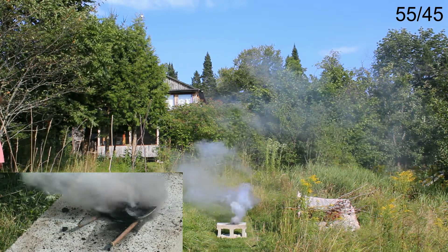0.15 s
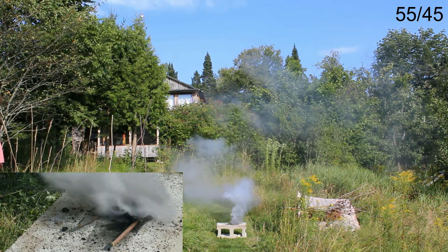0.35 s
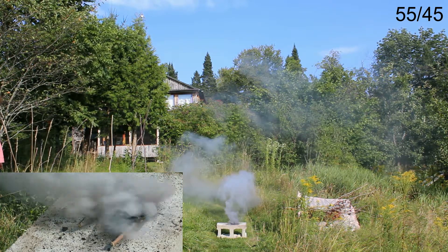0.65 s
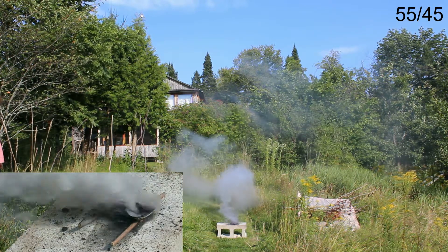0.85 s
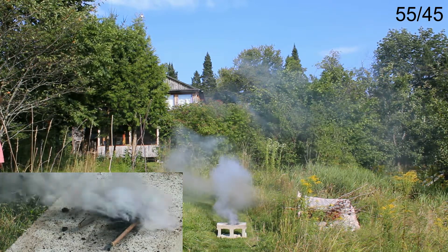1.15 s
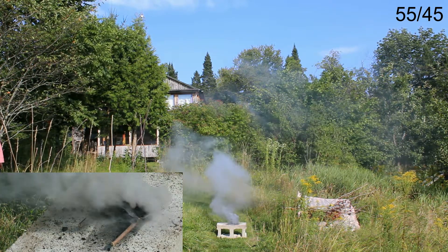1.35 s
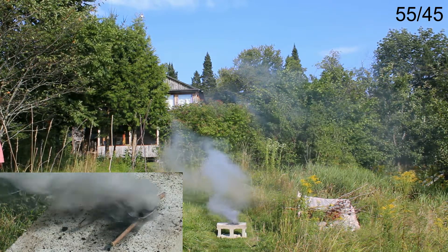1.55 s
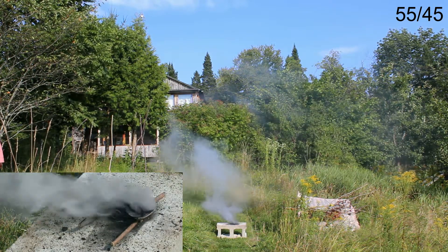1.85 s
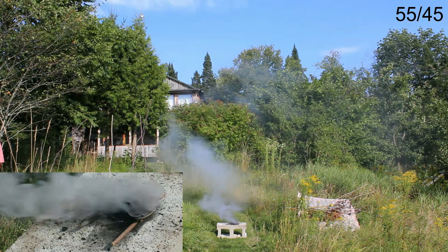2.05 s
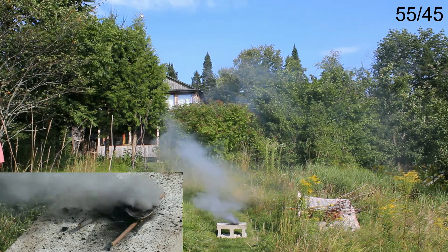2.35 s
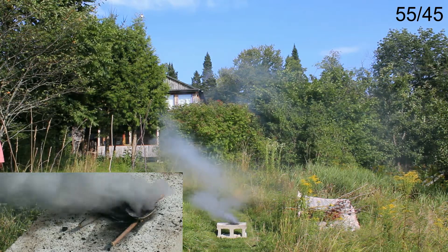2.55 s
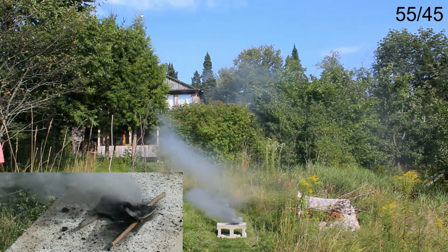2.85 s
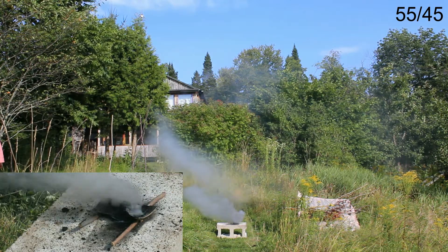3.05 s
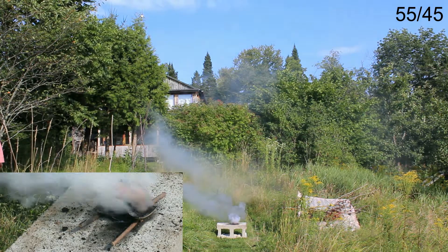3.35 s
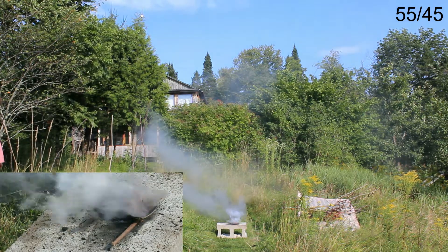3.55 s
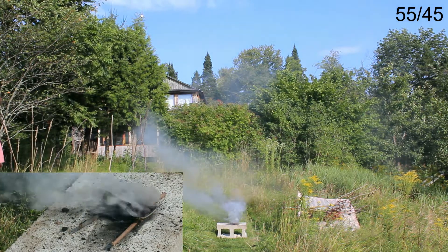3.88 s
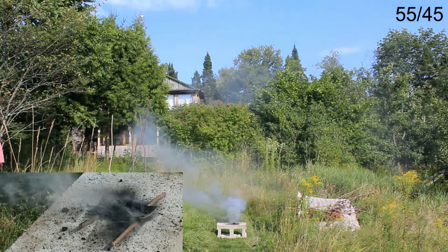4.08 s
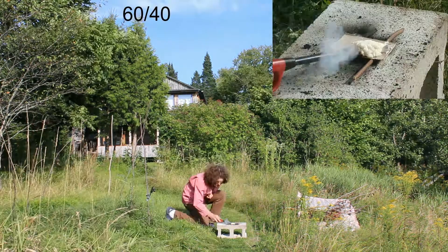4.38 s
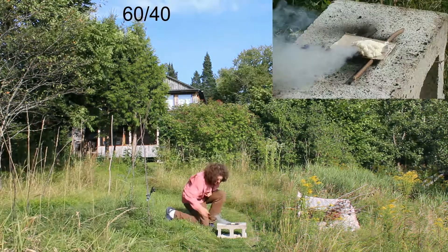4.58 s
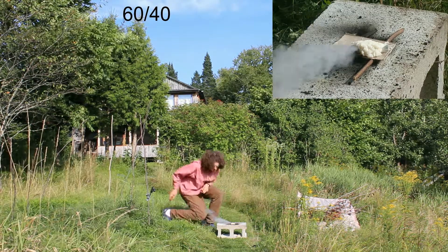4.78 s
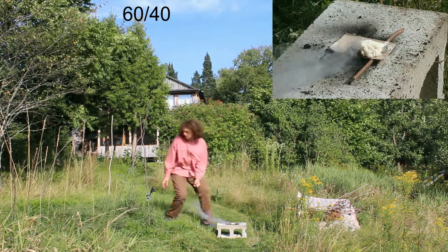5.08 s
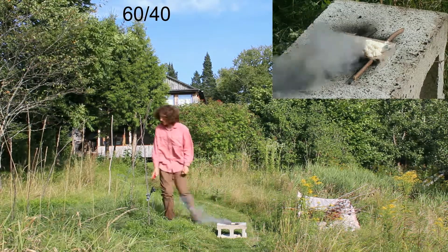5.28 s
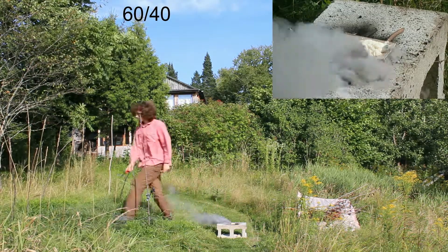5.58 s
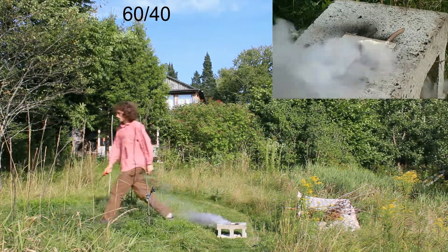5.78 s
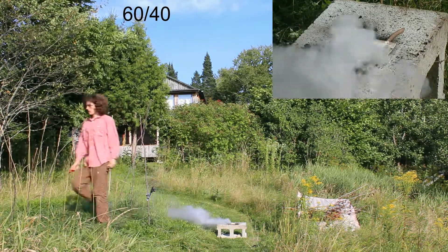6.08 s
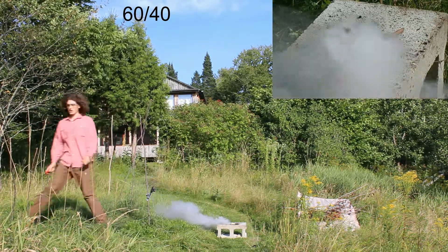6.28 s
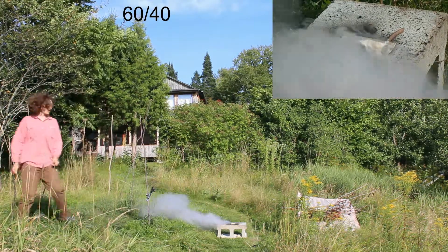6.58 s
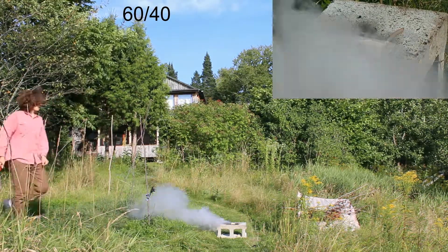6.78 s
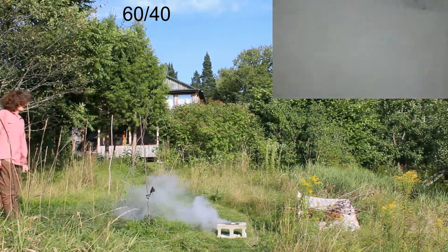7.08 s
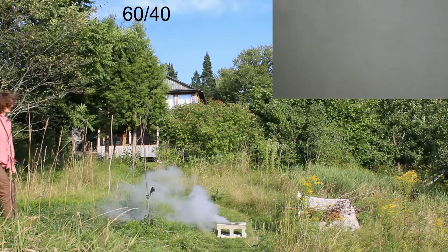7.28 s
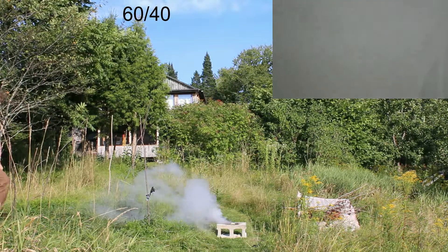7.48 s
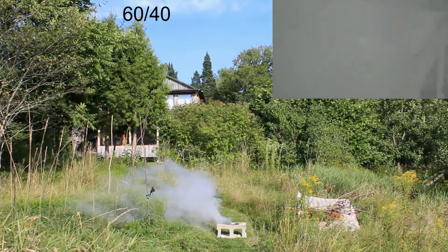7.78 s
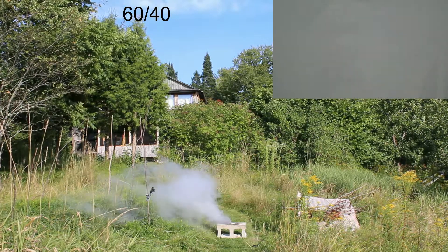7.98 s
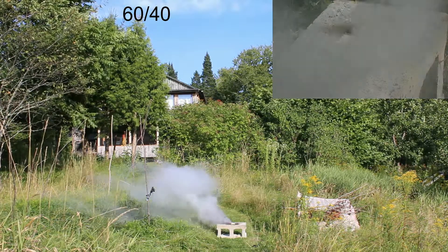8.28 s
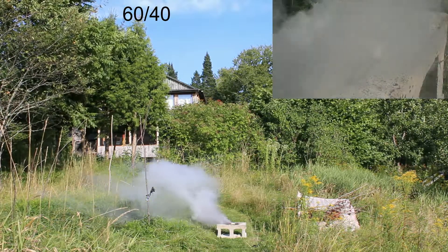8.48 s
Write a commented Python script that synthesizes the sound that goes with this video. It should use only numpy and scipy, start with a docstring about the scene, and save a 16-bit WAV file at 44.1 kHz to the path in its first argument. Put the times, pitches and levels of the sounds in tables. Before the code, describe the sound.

A close microphone catches gas escaping from a small burning heap: uneven high hiss, crackly fizz and a breathy mid roar. It chokes, puffs a few times and nearly stops, then an intense hiss jumps in with a tiny bright pop. About six seconds in, low thumps and rumbles buffet the microphone, the rush grows fuller and sweeps through the hiss, which continues to the end. Quiet open garden air.

```python
"""A hiss with a roar and a fizz in it gutters out in a few puffs, then returns abruptly at full flow.
Two small heaps of smoke mixture burn in turn on a concrete block in a garden, heard from close by.
Gas escaping through each crust is shaped turbulent noise peppered with tiny bursts.
As the second jet swings round, moving spectral hollows and ridges make the hiss hollow and phasey,
and the plume buffets the microphone with low rumbles and single swings of pressure."""
import sys
import numpy as np
from scipy import signal
from scipy.fft import rfft, irfft, next_fast_len
from scipy.io import wavfile
from scipy.ndimage import uniform_filter1d, map_coordinates

SR = 44100
rng = np.random.default_rng(int(sys.argv[2]) if len(sys.argv) > 2 else 0)


def file_out(sig):
    """Save sig as 16-bit WAV at sys.argv[1]."""
    # one column per channel
    cols = np.atleast_2d(sig).T
    # limit, then scale
    lim = np.clip(cols, -1, 1)
    pcm = np.round(lim * 32767).astype(np.int16)
    wavfile.write(sys.argv[1], SR, pcm)


N = 380583
SECOND_STARTS_S = 4.3455


def amp(db):
    """Level law: 20 dB is a factor of ten in pressure."""
    return 10 ** (np.asarray(db) / 20)


def unit(x):
    """Normalisation: equal rms means equal mean power, here 1."""
    return x / np.sqrt(np.mean(x ** 2) + 1e-20)


def clock():
    """Sampling: sample n falls at n / SR seconds."""
    return np.arange(N) / SR


def curves(rows):
    """Linear interpolation in time of each column after the first."""
    s, *columns = np.transpose(rows)
    return np.array([np.interp(clock(), s, column) for column in columns])


def wobble(rate):
    """Slow random modulation: a smooth curve through random knots, rate of them a second."""
    knots = rng.standard_normal(int(N * rate / SR) + 4)
    return map_coordinates(knots, [np.arange(N) * rate / SR])


def bell(centre, half, x=None):
    """Gaussian pulse of height 1, down to 1/e at half from its centre, in time unless x is given."""
    position = clock() if x is None else x
    return np.exp(-((position - centre) / half) ** 2)


def filtered(x, response):
    """Linear filtering: the spectrum is multiplied by a response of frequency."""
    size = next_fast_len(N + SR // 2)  # padding keeps the end from wrapping round to the start
    hz = np.fft.rfftfreq(size, 1 / SR)
    return irfft(rfft(x, size) * response(hz), size)[..., :N]


def coloured(x, spectrum):
    """Spectral shaping along (Hz, dB) points on a logarithmic frequency axis, at rms 1."""
    f, db = np.transpose(spectrum)
    return unit(filtered(x, lambda hz: amp(np.interp(np.log(hz + 1), np.log(f), db))))


def turbulence(patchy_db):
    """Turbulent noise: its colour shifts in small patches of time and frequency."""
    z = signal.stft(rng.standard_normal(N), nperseg=512)[2]
    across_frequency = uniform_filter1d(rng.standard_normal(z.shape), size=8, axis=0)
    patches = unit(uniform_filter1d(across_frequency, size=14, axis=1))
    return unit(signal.istft(z * amp(patchy_db * patches), nperseg=512)[1][:N])


def sputter(rate, spread_db):
    """Random impulse train: tiny gas bursts at chance moments, a few much larger than the rest."""
    happens = rng.random(N) < rate / SR
    size = amp(spread_db * np.minimum(rng.exponential(size=N), 4))
    return unit(happens * size * rng.choice([-1, 1], N))


def gas(spectrum, patchy_db, sputter_db):
    """Flow noise of escaping gas: turbulence peppered with bursts, under one spectrum."""
    bursts = amp(sputter_db) * sputter(rate=1500, spread_db=3)
    return coloured(turbulence(patchy_db) + bursts, spectrum)


def background():
    """Ambient sound: broadband garden air, with nearly pure tones whose phase drifts and a noise-band drone."""
    # garden air: frequency_hz, density_db
    garden = [(20, 6.5), (45, -34), (80, 1.5), (130, 2.5), (250, 2), (420, -2.5), (900, -4.5),
              (2000, -14.5), (5000, -12.5), (8900, -6), (12000, -14), (16000, -21)]
    # faint drone above the hum: frequency_hz, density_db
    drone_band = [(330, -33), (450, -4), (520, -3), (600, -3), (800, -30)]
    t = clock()
    air = amp(-63.5) * coloured(rng.standard_normal(N), garden)

    def tone(hz, db, drift_rad):
        phase = 2 * np.pi * hz * t + drift_rad * wobble(8)
        return amp(db) * np.sqrt(2) * np.sin(phase)

    # the thin electronic whine fades by 5 dB per second in the second burn
    whine_db = -75 - 5 * np.maximum(t - SECOND_STARTS_S, 0)
    whine = tone(14948, whine_db, drift_rad=1.5)
    hum = tone(75.4, -77, drift_rad=.3)
    drone = amp(-68) * coloured(rng.standard_normal(N), drone_band)
    hum_end_s, hum_fade_s = 5.6, .6  # the end is the middle of the fade
    present = (t >= SECOND_STARTS_S) * np.clip(.5 + (hum_end_s - t) / hum_fade_s, 0, 1)
    return air + whine + (hum + drone) * present


def buffeting():
    """Flow-induced microphone noise: gusts push the plume onto it as lumpy low-frequency rumble."""
    # gusts: centre_s, half_length_s, level_db (before the lumps)
    gusts = [(0.18, .04, -68), (0.32, 0.13, -65), (5.88, 0.11, -66), (6.188, 0.063, -57),
             (6.48, 0.16, -56.5), (6.72, .05, -65), (6.95, 0.066, -59), (7.08, 0.053, -62),
             (7.2, 0.068, -62), (7.42, 0.17, -71)]
    # rumble: frequency_hz, density_db
    rumble = [(15, -4), (40, -7), (80, -1), (120, -3), (200, -6.5), (400, -12), (900, -45)]
    level = sum(amp(db) * bell(s, half) for s, half, db in gusts)
    lumps = amp(2.1 * wobble(25))
    return level * lumps * coloured(rng.standard_normal(N), rumble)


def thumps():
    """Eddy pressure: each passing eddy is one swing, a pull and then a push."""
    # eddies that hit the microphone: centre_s, peak_db, pitch_hz
    eddies = [(.274, -55, 85), (0.328, -49, 100), (5.989, -51, 85), (6.008, -52, 100), (6.138, -44.5, 189),
              (6.162, -45, 89), (6.204, -47, 110), (6.236, -49, 89), (7.392, -56, 90), (7.565, -54, 70)]
    swings = [(2 * np.pi * hz * (clock() - s), db) for s, db, hz in eddies]
    return sum(amp(db) * u * np.exp((1 - u * u) / 2) for u, db in swings)  # peaks at u = -1 and 1


def wash():
    """Superposed flow noise: the rush turns fuller while the smoke passes over the microphone."""
    # rush of the smoke: frequency_hz, density_db
    wash_spectrum = [(380, -13.5), (560, -4.5), (800, -4), (1300, -0.5), (1800, -12), (2300, -4),
                     (2750, 5.5), (3300, -1), (4500, -25)]
    passing = bell(6.68, half=0.53)
    return amp(-47 + 0.7 * wobble(20)) * passing * gas(wash_spectrum, patchy_db=1.5, sputter_db=-12)


def pops():
    """Impulsive release: a bursting grain gives a short, bright puff that decays exponentially."""
    # grains that burst: start_s, level_db, t60_s
    grains = [(4.4855, -24.5, .012), (5.7803, -40, .012)]
    level = 0
    for s, db, t60 in grains:
        age = clock() - s
        level = level + (age >= 0) * amp(db - 60 * np.abs(age) / t60)
    # frequency_hz, density_db
    bright = [(500, -24), (3200, -3), (7000, 0), (11000, 3), (13000, -4), (15500, -12)]
    return level * coloured(rng.standard_normal(N), bright)


def guttering():
    """Intermittent flow: the last crumbs of the first heap flare up one by one."""
    # last puffs: centre_s, half_length_s, level_db
    puffs = [(4.059, 0.029, -53), (4.117, 0.0066, -54), (4.149, 0.017, -51), (4.222, 0.019, -55),
             (4.3, 0.023, -64)]
    # their noise: frequency_hz, density_db
    crumbs = [(600, -9), (2000, -14), (3300, -2.5), (4900, -10), (7400, 5), (10500, -2.5), (15000, -20)]
    level = sum(amp(db) * bell(s, half) for s, half, db in puffs)
    return level * gas(crumbs, patchy_db=-1, sputter_db=2)


def swish(x):
    """Time-varying filtering: drifting hollows and ridges turn the hiss phasey while the jet swings."""
    # hollows (negative) and ridges (positive): centre_s, half_length_s, centre_hz, glide_hz_per_s, gain_db
    hollows = [(6.28, .18, 9800, 800, -9), (6.33, .15, 9250, -600, 7), (6.6, .4, 6200, 0, -6),
               (6.65, .4, 5400, -300, 4), (6.55, .1, 8100, 0, -4), (6.8, .35, 11250, 0, 4),
               (6.85, .3, 10700, 0, -5), (6.9, .3, 13700, 0, 4), (7.05, .22, 8900, -500, -7)]
    hz, t, z = signal.stft(x, SR, nperseg=512)
    gain_db = 0
    for s, half, centre_hz, glide, db in hollows:
        band = bell(centre_hz + glide * (t - s), 340, hz[:, None])  # half width 340 Hz
        gain_db = gain_db + db * bell(s, half, t) * band
    return signal.istft(z * amp(gain_db), SR, nperseg=512)[1][:N]


def plume_rush():
    """Low-frequency flow noise of the plume, louder as it leans towards the microphone."""
    # lean of the plume: time_s, gain_db
    lean = [(0, 0.5), (4.4, 0.5), (5.0, -4), (5.38, 0.5), (5.48, -3), (5.68, -3.5), (5.8, 0.5), (6.55, 2.5),
            (7.25, -3), (7.7, -4), (8.63, -2.5)]
    # rush: frequency_hz, density_db
    plume_spectrum = [(150, -27), (300, -17), (430, -26.5), (550, -12.5), (800, -6), (1080, -1.5),
                      (1500, -5), (2000, -8), (3000, -16), (6000, -52)]
    return amp(curves(lean)[0]) * gas(plume_spectrum, patchy_db=0.5, sputter_db=-14)


def jet_roar():
    """Jet noise: a broad mid-frequency band of turbulence."""
    # roar: frequency_hz, density_db
    roar_spectrum = [(700, -30), (1500, -24.5), (2000, -17), (2350, -10), (2850, -3.5), (3700, -2),
                     (4300, -3), (4900, -9.5), (5600, -5.5), (7000, -6), (10000, -65)]
    return gas(roar_spectrum, patchy_db=0.5, sputter_db=-10)


def pore_hiss(surge_db):
    """Addition of powers: broad and focused hiss share unit power; fresh vents add that of a surge."""
    # sharpening from the broad hiss to the focused one: time_s, focused_power_share
    focusing = [(0, 0.38), (3.1, .05), (3.45, 1), (4.0, .7), (4.36, 0.86), (8.63, 0.7)]
    # open crust, tighter crust and fresh vent, each: frequency_hz, density_db
    broad_spectrum = [(4500, -29), (4950, -9), (5450, 1), (6100, -1.5), (6700, -0.5), (7250, 5),
                      (8200, 0.5), (8900, -3), (9700, -2), (10600, -9), (11800, -5.5), (14000, -20)]
    sharp_spectrum = [(4500, -33.5), (4950, -24.5), (5550, -8.5), (6200, -14), (6700, -5.5), (7250, 1),
                      (8200, 0), (8950, -7.5), (9900, -5.5), (10700, -7.5), (11800, -20.5), (13000, -34),
                      (15000, -45)]
    vent_spectrum = [(4800, -31.5), (5600, -12), (6400, -11.5), (7200, 0), (8100, -0.5), (9000, -8.5),
                     (10200, -4.5), (12500, -27)]
    focus = np.clip(curves(focusing)[0], 0, 1)
    broad = np.sqrt(1 - focus) * gas(broad_spectrum, patchy_db=3.3, sputter_db=-5)
    sharp = np.sqrt(focus) * gas(sharp_spectrum, patchy_db=1.1, sputter_db=-17)
    vent = np.sqrt(amp(surge_db) ** 2 - 1) * gas(vent_spectrum, patchy_db=3.1, sputter_db=-11)
    return broad + sharp + vent


def fine_fizz():
    """High-frequency flow noise of the finest pores, flaring as fresh mixture catches."""
    # flares: centre_s, half_length_s, rise_db
    flares = [(0.74, .035, 9.5), (1.16, 0.036, 6), (1.293, .06, 13), (1.55, 0.12, 7.5), (1.82, .025, 7.5),
              (2.02, 0.023, 4), (2.356, 0.11, 5), (2.514, 0.023, 6.5), (2.71, 0.044, 3), (3.22, 0.012, 7.5),
              (3.307, .045, 6.5), (3.617, .022, 8), (4.91, .05, 12), (5.406, 0.08, 8), (5.56, 0.098, 10.5),
              (6.134, 0.054, 6.5), (7.31, .07, 7.5), (7.794, .05, 15), (8.423, 0.086, 9.5)]
    # fizz: frequency_hz, density_db
    fizz_spectrum = [(5000, -43), (8300, -8), (9000, -12), (9700, 1), (11300, 2), (12600, -3.5),
                     (14000, -7), (15000, -26), (15500, -16)]
    flare_db = sum(db * bell(s, half) for s, half, db in flares)
    return amp(flare_db + 0.6 * wobble(45)) * gas(fizz_spectrum, patchy_db=2.0, sputter_db=-9)


def burn():
    """Common modulation: one uneven flow drives the plume, jet, pores and finest pores together."""
    # slow course of each burn: time_s, roar_db, hiss_db, fizz_db
    first_burn = [(0, -46, -41, -46.5), (0.35, -42, -43.5, -45), (0.7, -43, -42, -48.5),
                  (0.98, -44, -43.5, -46.5), (1.6, -42.5, -41.5, -48), (2.15, -43, -43, -44.5),
                  (2.6, -42, -43.5, -43), (2.85, -44, -42, -44), (3.45, -44, -41, -46),
                  (3.85, -48, -42.5, -47), (3.93, -52, -44, -62), (4.0, -53.5, -46, -59),
                  (4.08, -66, -54, -71)]
    second_burn = [(4.35, -45.5, -38.5, -57), (4.5, -43, -36.5, -56), (4.85, -43, -33.5, -55),
                   (5.35, -42.5, -35.5, -51.5), (5.65, -45, -35.5, -49), (5.9, -42, -38.5, -49.5),
                   (6.15, -45, -40, -48.5), (6.45, -42.5, -42, -46), (6.9, -39.5, -41, -45.5),
                   (7.12, -39.5, -39, -47.5), (7.3, -39.5, -37, -50), (7.68, -41.5, -35.5, -64),
                   (7.82, -45.5, -36, -55), (8.02, -47, -37, -54), (8.63, -43, -40, -50)]
    # a vent opens and the hiss surges: centre_s, half_length_s, rise_db
    surges = [(0.06, 0.054, 3.5), (0.21, .04, 2.5), (0.334, 0.048, 4.5), (0.655, 0.1, 6), (0.87, .04, 5.5),
              (1.24, 0.053, 2), (1.422, 0.042, 4), (1.617, 0.028, 4), (2.614, 0.11, 4.5), (3.325, 0.028, 0),
              (3.51, 0.25, 5), (3.86, 0.053, 3.5), (5.935, 0.048, 5.5), (6.755, .045, 5.5),
              (7.123, 0.069, 4), (7.36, 0.054, 2.5), (7.546, .07, 0.5), (7.734, 0.075, 2)]
    # slag clogs the vent for a moment: centre_s, half_length_s, hiss_loss_db, fizz_loss_db
    chokes = [(0.977, 0.053, 1, 1), (1.06, .025, -3, 16), (1.753, 0.038, 3, 7), (1.91, 0.03, 0, 5),
              (2.1, 0.026, 0.5, 6), (3.393, 0.029, 5, 6), (3.535, .025, 0.5, 3), (3.69, 0.031, 8, 4),
              (5.733, 0.064, 8.5, 14), (6.95, .05, 3, -0.5), (7.62, 0.044, 1.5, 6), (7.932, 0.059, -1, 14)]
    t = clock()
    first = t < SECOND_STARTS_S
    roar_db, hiss_db, fizz_db = np.where(first, curves(first_burn), curves(second_burn))
    surge_db = np.abs(sum(db * bell(s, half) for s, half, db in surges))
    hiss_loss_db, fizz_loss_db = sum(np.outer(loss, bell(s, half)) for s, half, *loss in chokes)
    jet_db = roar_db + 0.14 * (surge_db - hiss_loss_db)  # the roar follows by a share of the dB
    flutter = wobble(32) + .5 * wobble(90)  # the uneven burning front shakes the whole flow

    plume = amp(jet_db - 10.5 + 0.3 * flutter) * plume_rush()
    roar = amp(jet_db + 0.49 * flutter) * jet_roar()
    hiss = amp(hiss_db - hiss_loss_db + 0.63 * flutter) * pore_hiss(surge_db)
    fizz = amp(fizz_db - fizz_loss_db + 0.96 * flutter) * fine_fizz()

    burnt_out_s, choke_off_s = 4.088, 0.011  # the first jet chokes off
    alight = np.where(first, np.clip((burnt_out_s - t) / choke_off_s, 0, 1), 1)
    return alight * (plume + roar + hiss + fizz)


def scene():
    """Superposition: all pressures add at one microphone, which feeds both channels."""
    at_microphone = background() + buffeting() + thumps() + wash() + pops() + guttering()
    sound = at_microphone + swish(burn())
    return np.array([sound, sound])


def record(dry):
    """Band limiting: an ideal low-pass filter removes everything from 15720 Hz up."""
    return filtered(dry, lambda hz: hz < 15720)


dry = scene()
out = record(dry)
file_out(out)
```